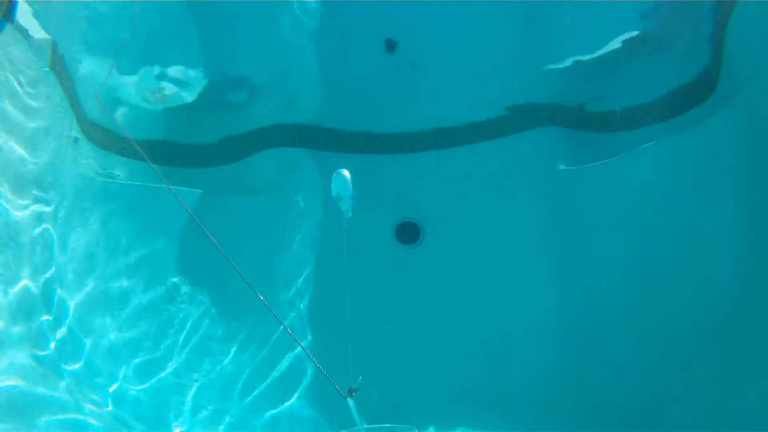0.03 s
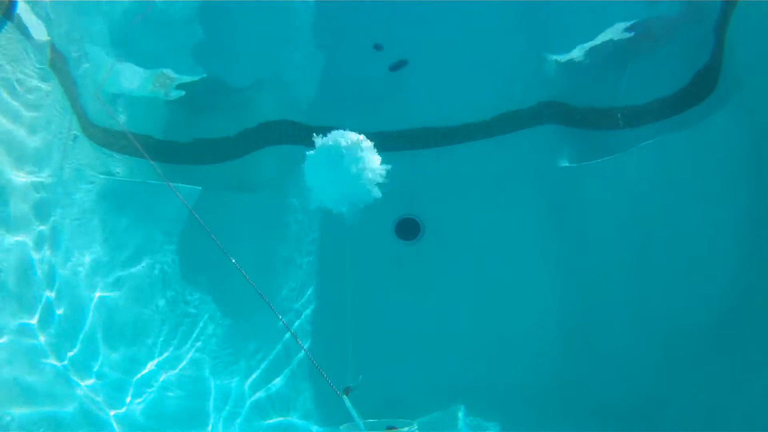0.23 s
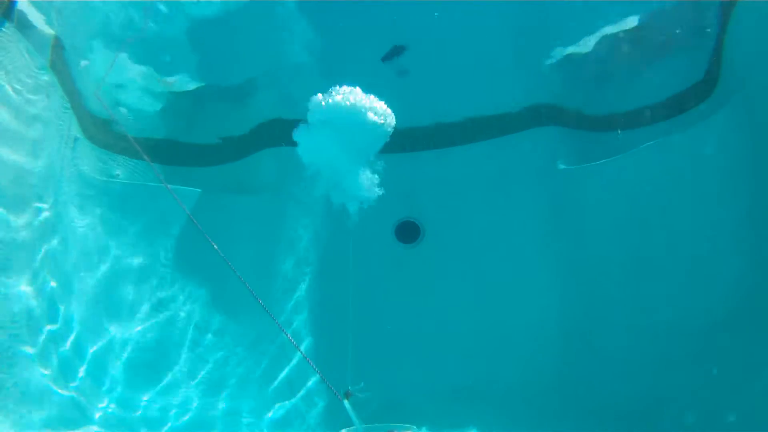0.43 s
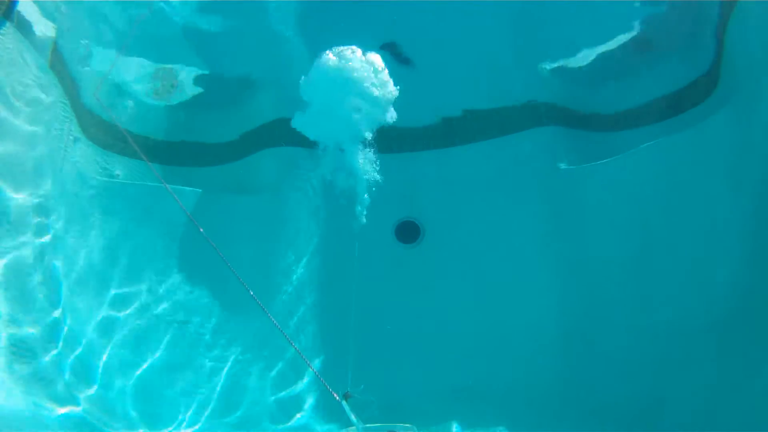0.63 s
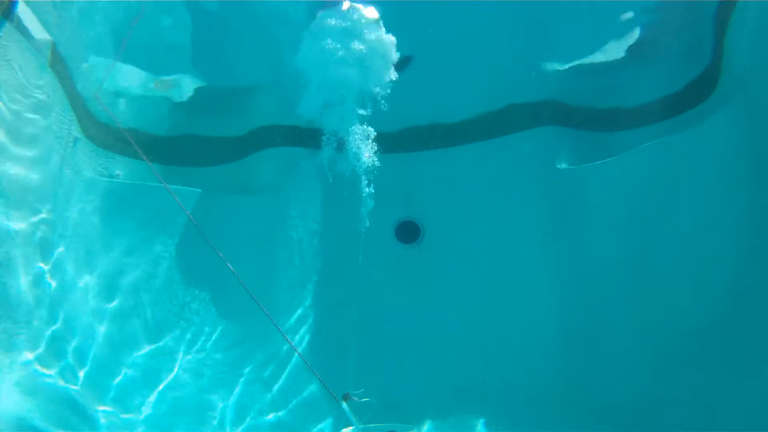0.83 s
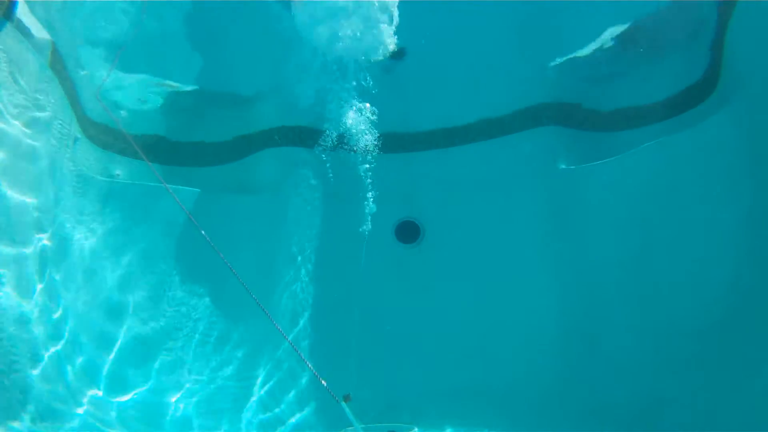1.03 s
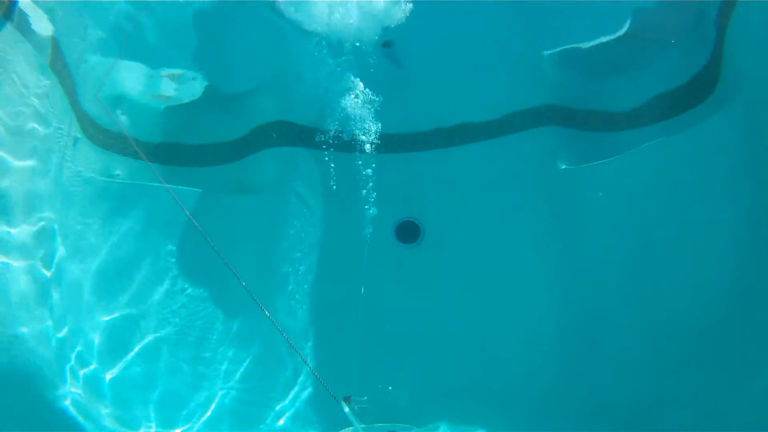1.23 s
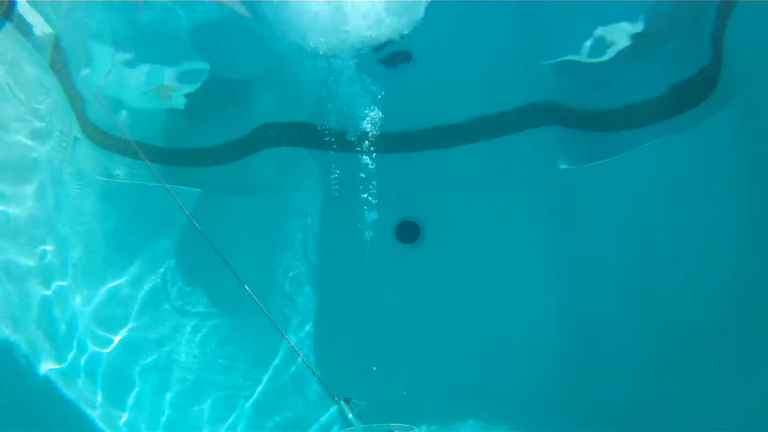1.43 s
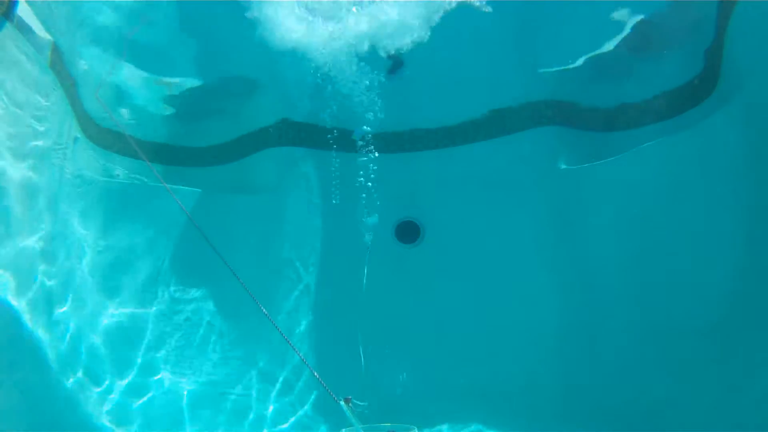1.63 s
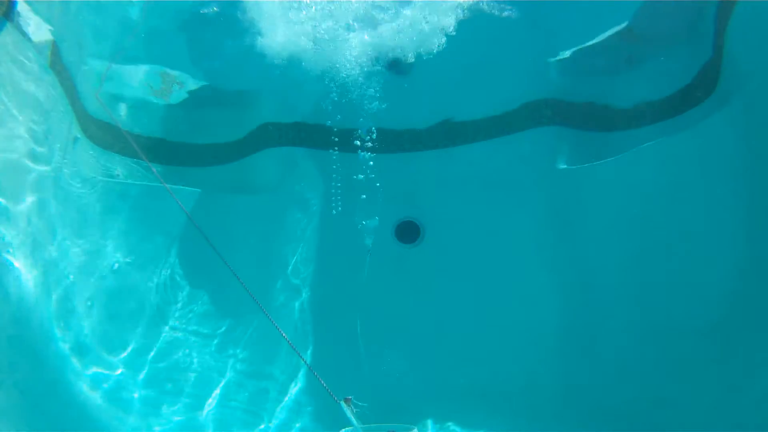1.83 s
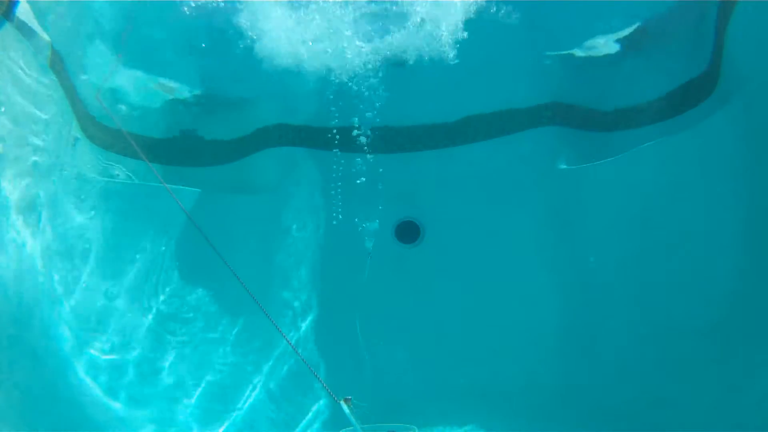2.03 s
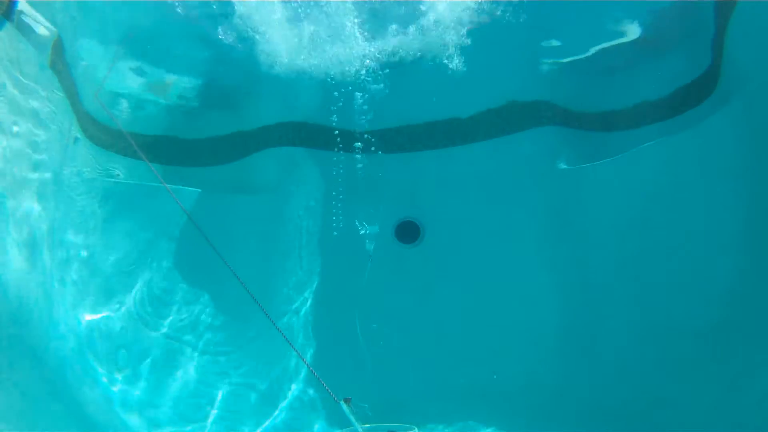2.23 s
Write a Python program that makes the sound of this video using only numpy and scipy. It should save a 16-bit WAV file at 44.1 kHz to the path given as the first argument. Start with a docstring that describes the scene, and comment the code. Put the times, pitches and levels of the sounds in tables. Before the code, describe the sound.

Underwater bottle burst: one hard distorted crack, quick dull gurgling thuds, then quiet boxy bubbles

```python
"""Faint creaks and a short low hum come first, then a pressurised bottle bursts under water in a pool.
The bottle is a set of dying tones with a shock, tearing snaps and filtered noise; gas pockets thump as short swings.
The big bubble throbs as a gliding tone that rises in pitch, and small bubbles gurgle as random clicks and noise.
A microphone in a ringing sealed housing hears it; its amplifier overloads, turns itself down and creeps back up."""
import sys
import numpy as np
from scipy import signal
from scipy.io import wavfile
from scipy.ndimage import uniform_filter1d

SR = 44100
rng = np.random.default_rng(int(sys.argv[2]) if len(sys.argv) > 2 else 0)


def int16_out(signal):
    """Quantize to a 16-bit WAV file."""
    q = np.round(np.clip(np.atleast_2d(signal).T, -1, 1) * 32767)
    wavfile.write(sys.argv[1], SR, q.astype(np.int16))


N = 101429  # length in samples

# Ring of the burst bottle: pitch_hz, level_db (added to BURST_DB), t60_s (time to fall by 60 dB)
BOTTLE_RING = [(408.53, -6.5, 0.045), (715.41, 1, .09), (858, -12.5, 0.11), (1162.2, -10, 0.057),
               (1225.4, -12, .09), (1592.4, -19.5, 0.082), (2008.5, -17.5, 0.064), (2137.5, -19.5, 0.12),
               (3400, -19, .02)]
# Tones of the tearing bottle wall: pitch_hz, peak_db, delay_s (after the burst), length_s (centre to 1/e)
WALL_SNAPS = [(654.27, 10, .006, 0.0031), (415.09, 5, .004, 0.0024), (1100, 6, 0.0022, .002)]
# Thumps of gas pockets: centre_s, peak_db, pitch_hz, length_s (centre to the faded edge), start_turns
GAS_THUMPS = [(0.2792, -6, 150, 0.005, 0.5915), (0.2897, 4.5, 150, 0.006557, 0.74),
              (0.304, -10.5, 59.2, .03, -0.23), (.3175, 1.5, 250, 0.002566, 0.4418),
              (0.3215, -7.5, 340, 0.00715, 0.6677), (0.3316, -4.5, 319.2, 0.01, 0),
              (0.3373, -6, 150, 0.0047, -0.1264), (0.3485, -3, 231.1, 0.007937, .45),
              (0.361, -2, 280.1, 0.01439, 0.3959), (0.379, -12, 71.82, .022, 0.7),
              (0.4096, -10.5, 98.96, 0.00963, 0.45), (.430, -9, 307.6, 0.003251, 0),
              (0.4372, -2, 255, 0.0058, 0.75), (0.447, -10.5, 312.7, 0.015212, 0.1161),
              (0.455, -8, 269.5, 0.018548, 0), (.48, -20, 135.6, 0.03, 0.14),
              (0.499, -25, 310, 0.016, 0.0366), (.525, -31, 144.9, 0.09, 0.0492)]
# Throb of the big bubble: time_s, pitch_hz, level_db
BUBBLE_THROB = [(.245, 24.14, -17.5), (.3, 23.49, -16.5), (0.481, 23.18, -21), (.65, 23.31, -31.5),
                (.78, 24.09, -38), (.94, 25.86, -51), (1.02, 28.81, -47), (1.14, 38.48, -63),
                (1.3, 59.06, -44), (1.4, 75.4, -65.5), (1.5, 93.36, -55), (1.651, 100.2, -60),
                (2.001, 100.2, -63)]
# Creaks and gurgles: start_s, level_db, length_s (fall to 1/e), tilt_db (per octave, around 700 Hz)
HOUSING_KNOCKS = [(.003, -58, 0.019615, -9), (0.035, -44.5, 0.00778, 2), (0.05, -57, 0.0099, 6.5),
                  (0.089, -55.5, 0.008844, 2), (0.099, -42, 0.00489, -2), (0.116, -63, 0.00868, 12),
                  (0.143, -47.5, 0.009488, 3), (0.159, -55.5, 0.00863, -4.5), (0.196, -56, 0.011, 3.5),
                  (0.285, -40, .004, 2.5), (0.312, -27, 0.014127, -1), (0.335, -41, 0.0088, -8.5),
                  (0.353, -27, 0.01072, -13.5), (0.405, -46.5, 0.009, 1), (0.434, -40, 0.014, -1.5),
                  (0.495, -46.5, 0.02, -6.5), (2.216, -46.5, 0.020588, -1)]
# Loudness curve of the bubbling: time_s, level_db
BUBBLING_LEVEL = [(0, -61.5), (.24, -64), (.3, -44.5), (.5, -47), (.65, -50.5), (.9, -49.5), (1.25, -53),
                  (1.4, -50.5), (1.52, -46), (1.63, -45.5), (1.78, -46), (1.9, -51.5), (2.1, -51),
                  (2.3, -49.5)]
# Resonances of the housing: pitch_hz, width_hz (of each of two passes), level_db (before any tilt or flicker)
HOUSING_MODES = [(176.37, 33, -7.5), (260.09, 35, -1), (344.56, 61, -1), (380.2, 36, -4), (635, 54, -9),
                 (718.94, 96, 1.5), (862, 58, -8.5), (1005, 150, -10), (1267, 50, -19), (1653.3, 81, -14),
                 (2117, 100, -21.5), (2367.1, 500, -30), (3600, 2100, -46)]

BURST_S, BURST_DB = .2431, 14
CHOKE_S, CHOKE_FADE_S = .2748, .0012  # the ring of the burst is cut short here
SHOCK_DB, SHOCK_S = 8, .0008
CRACK_DB, CRACK_T60_S, CRACK_HZ = -6, 0.026, 1565
SPLASH_DB, SPLASH_T60_S, SPLASH_HZ = -12, .08, 1983
ECHO_DB, ECHO_T60_S = -9, 0.35
RUMBLE_DB, RUMBLE_T60_S, RUMBLE_HZ = -8, 0.45, 72
BLOW_LOW_HZ = 316.6  # sharp blows barely move the housing below this
THUMP_ROUGH, THUMP_GRIT_HZ, THUMP_DULL_HZ = .12, 330, 1071.7
CHURN_DB, CHURN_HZ = -27.5, 1000  # hiss of turbulence, before it follows the thumps
THROB_OVERTONE_DB = -16
BUBBLES_PER_S, BUBBLE_SCATTER_DB = 400, 2.5
WASH_DB, FLICKER_DB, SWELL_DB = 0.5, 2, 0.7  # wash against the pops; random level swings
LOWS_DB, LOWS_FLICKER_DB, LOWS_HZ = -17, 2.9, 110.22  # slosh against the ringing bubbles
GAP_HZ, GAP_WIDE_HZ, GAP_SHARE = 493.44, 164.7, 0.8  # the housing passes little here
HUM_HZ, HUM_DB, HUM_S, HUM_LENGTH_S = 58, -62, .17, .05
HISS_DB, HISS_HZ = -71, 2943
GAIN_TOP_DB, GAIN_DROP_DB, GAIN_LAG_S = -1, 20, 0.0073
GAIN_FALL_S, GAIN_RISE_DB_S = 0.0022, 6
CLIP_DB, DROOP_HZ, DROOP_SHARE = -1.5, 242, .7
TOP_HZ = 15800


def undb(db):
    """Turn decibels into a plain multiplier."""
    return 10 ** (np.asarray(db) / 20)


def level(x, db):
    """Scale a sound to an average (RMS) level in dB."""
    return x * undb(db) / np.sqrt(np.mean(x ** 2))


def band(x, hz, width):
    """Two-pole resonance that keeps its centre at full strength and weakens the rest."""
    return signal.lfilter(*signal.iirpeak(hz, hz / width, fs=SR), x)


def band_twice(x, hz, width):
    """Two equal resonances in a row, for steeper sides."""
    return band(band(x, hz, width), hz, width)


def noise():
    """Plain random noise, equally strong at all pitches."""
    return rng.standard_normal(N)


def fade_db(db, after, t60):
    """Start at a level in dB and die away by 60 dB in t60 seconds."""
    return undb(db - 60 * after / t60)


def walk(rate):
    """Random levels, each held 1 / rate seconds, with the steps smoothed twice."""
    hold = int(SR / rate)
    steps = np.repeat(rng.standard_normal(N // hold + 1), hold)
    smooth = uniform_filter1d(uniform_filter1d(steps, hold), hold)
    return 1.3 * smooth[:N]


def thin(x):
    """Cut the bass, as a sharp blow has little of it."""
    return signal.lfilter(*signal.butter(2, BLOW_LOW_HZ, "high", fs=SR), x)


def housing(x, tilt_db=0):
    """The sealed housing rings at its own pitches; the tilt favours high or low ones."""
    return sum(undb(db + tilt_db * np.log2(hz / 700)) * band_twice(x, hz, width)
               for hz, width, db in HOUSING_MODES)


def burst(t):
    """The blow rings the bottle, with shock front, tearing snaps, crackle, splash, echoes and rumble."""
    after = np.maximum(t - BURST_S, 0)
    started = t >= BURST_S
    ring = sum(fade_db(BURST_DB + db, after, t60) * np.sin(2 * np.pi * hz * after)
               for hz, db, t60 in BOTTLE_RING)
    snap = sum(undb(db) * np.exp(-((after - delay) / length) ** 2) * np.sin(2 * np.pi * hz * after)
               for hz, db, delay, length in WALL_SNAPS)
    # echoes off the pool walls
    echoes = fade_db(ECHO_DB, after, ECHO_T60_S) * level(housing(thin(noise()), 1.2), 0)
    crack = fade_db(CRACK_DB, after, CRACK_T60_S) * level(band(noise(), CRACK_HZ, 2500), 0)
    spray = band(band(noise(), SPLASH_HZ, 3400), SPLASH_HZ, 7000)
    splash = fade_db(SPLASH_DB, after, SPLASH_T60_S) * level(spray, 0)
    shock = undb(SHOCK_DB) * np.exp(-after / SHOCK_S)
    choke = np.clip((CHOKE_S - t) / CHOKE_FADE_S, 0, 1)
    low = level(band_twice(noise(), RUMBLE_HZ, 60), 0)
    rumble = fade_db(RUMBLE_DB, after, RUMBLE_T60_S) * low  # not choked
    return started * ((ring + snap + echoes + crack + splash + shock) * choke + rumble)


def thumps(t):
    """Gas pockets swing under a smooth bump; turbulence roughens the higher-pitched ones more."""
    grit = level(band_twice(noise(), THUMP_GRIT_HZ, 500), 0)
    swings = np.zeros(N)
    for centre, db, hz, length, turns in GAS_THUMPS:
        u = t - centre
        bump = undb(db) * np.exp(-(3 * u / length) ** 2)
        roughness = 1 + THUMP_ROUGH * min(hz / 300, 1) ** 2 * grit
        swings += bump * np.cos(2 * np.pi * (hz * u + turns)) * roughness
    turbulence = band(band_twice(noise(), CHURN_HZ, 1800), CHURN_HZ, 1800)
    # the hiss grows and fades with the thumps
    churn = uniform_filter1d(np.abs(swings), size=500) * level(turbulence, CHURN_DB)
    return signal.lfilter(*signal.butter(2, THUMP_DULL_HZ, fs=SR), swings) + churn


def throb(t):
    """The big bubble breathes in and out, rising in pitch as it nears the surface."""
    s, hz, db = np.array(BUBBLE_THROB).T
    phase = 2 * np.pi * (np.cumsum(np.interp(t, s, hz)) / SR + .15)
    loudness = undb(np.interp(t, s, db, left=-200, right=-200))  # silent outside the table
    return loudness * (np.sin(phase) + undb(THROB_OVERTONE_DB) * np.sin(2 * phase + 1.3))


def knocks(t):
    """Creaks and gurgles are short rough scrapes that set the housing ringing."""
    scrape = thin(noise())
    out = np.zeros(N)
    for start, db, length, tilt_db in HOUSING_KNOCKS:
        a, b = int(start * SR), int((start + .12) * SR)
        u = t[a:b] - start
        rung = housing(scrape[a:b] * np.exp(-(u / length) ** 2), tilt_db)
        loud_part = rung[u < length + .005]  # this part sets the level
        out[a:b] += rung * undb(db) / np.sqrt(np.mean(loud_part ** 2))
    return out


def gap(x):
    """The housing passes little of one band, so most of it is taken out."""
    return x - GAP_SHARE * band(x, GAP_HZ, GAP_WIDE_HZ)


def bubbling(t):
    """Scattered small pops and a wash of water ring the housing, with low slosh below."""
    pop_now = rng.random(N) < BUBBLES_PER_S / SR
    pops = pop_now * noise() * undb(BUBBLE_SCATTER_DB * rng.exponential(size=N))
    mix = level(pops, 0) + undb(WASH_DB) * noise()
    # each resonance flickers on its own
    rung = sum(undb(db + FLICKER_DB * walk(25)) * band_twice(mix, hz, width)
               for hz, width, db in HOUSING_MODES)
    slosh = level(band_twice(noise(), LOWS_HZ, 130), 0) * undb(LOWS_DB + LOWS_FLICKER_DB * walk(25))
    loudness_db = np.interp(t, *np.array(BUBBLING_LEVEL).T) + SWELL_DB * walk(12)
    return gap(level(rung, 0) + slosh) * undb(loudness_db)


def hum(t):
    """A faint low tone swells briefly before the burst."""
    swell = np.exp(-((t - HUM_S) / HUM_LENGTH_S) ** 2)
    return undb(HUM_DB) * swell * np.sin(2 * np.pi * HUM_HZ * t)


def hiss():
    """A steady faint hiss: noise through one very wide resonance."""
    return level(band(noise(), HISS_HZ, 14000), HISS_DB)


def scene():
    """Add up all the sounds, as one channel."""
    t = np.arange(N) / SR
    return (burst(t) + thumps(t) + throb(t) + knocks(t) + bubbling(t) + hum(t) + hiss())[None]


def record(dry):
    """Overload makes the gain drop a moment later and creep back; clipped tops droop as bass is thinned."""
    t = np.arange(N) / SR
    overload_s = t[np.argmax(np.abs(dry[0]) > undb(GAIN_TOP_DB))]  # first overload
    since = t - overload_s - GAIN_LAG_S
    creep_db = np.maximum(GAIN_DROP_DB - GAIN_RISE_DB_S * since, 0)
    drop_db = np.clip(since / GAIN_FALL_S, 0, 1) * creep_db
    flat = undb(CLIP_DB) * np.tanh(dry * undb(-drop_db - CLIP_DB))  # soft clipping
    bass = signal.lfilter(*signal.butter(1, DROOP_HZ, fs=SR), flat)
    droop = np.clip(flat - DROOP_SHARE * bass, -1, 1)
    top_cut = signal.ellip(12, .2, 90, TOP_HZ, fs=SR, output="sos")  # steep treble limit
    return signal.sosfilt(top_cut, droop)


dry = scene()
out = record(dry)
int16_out(out)
```